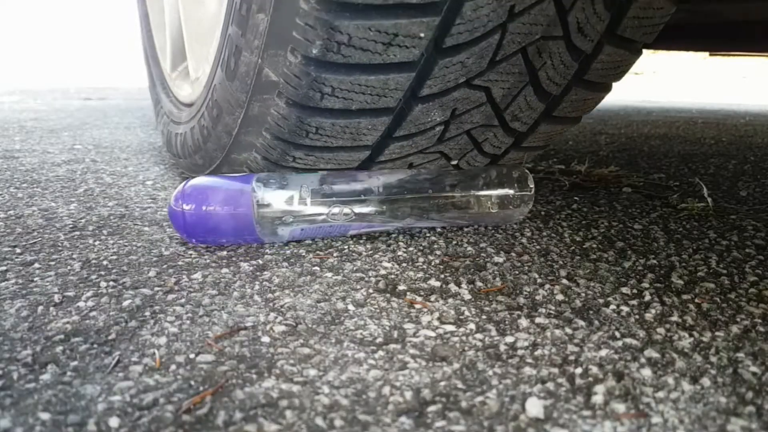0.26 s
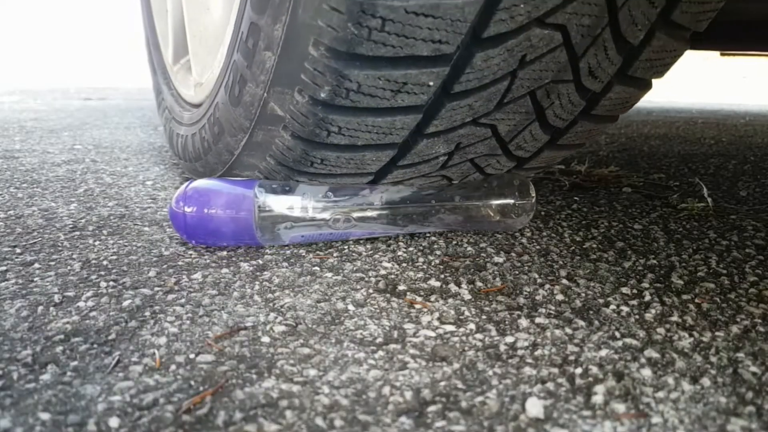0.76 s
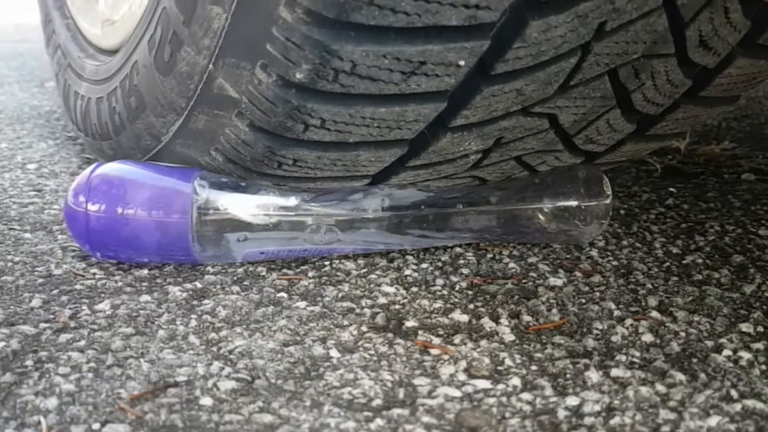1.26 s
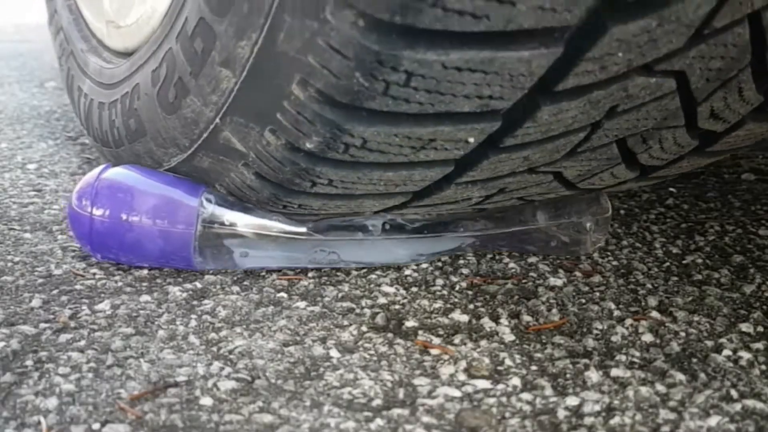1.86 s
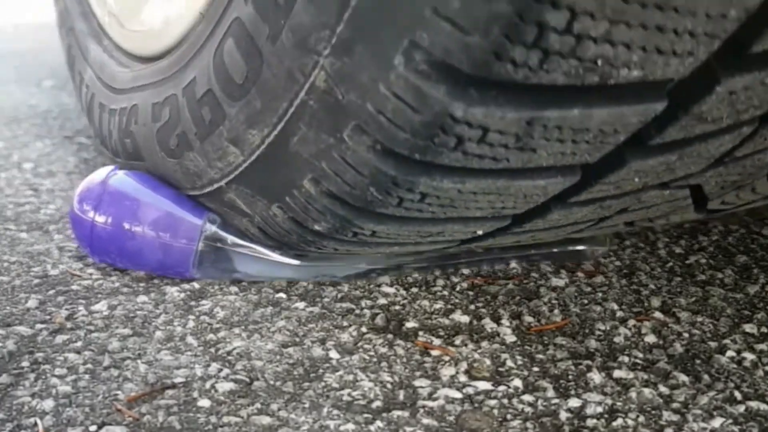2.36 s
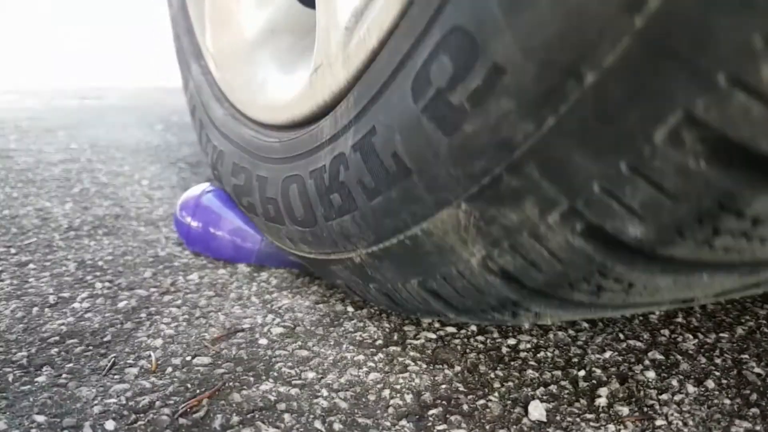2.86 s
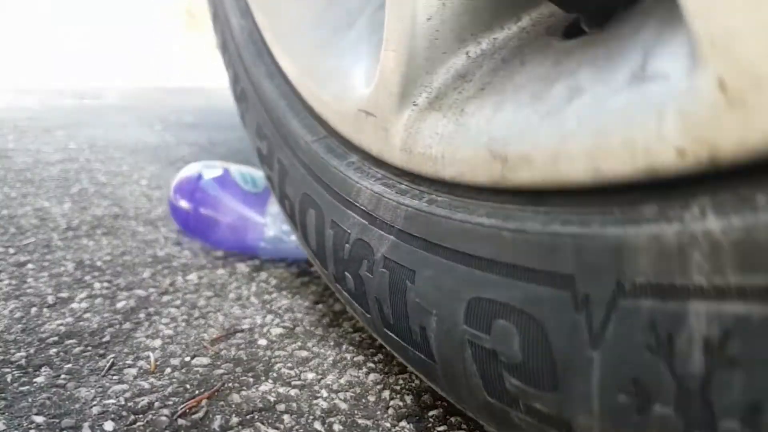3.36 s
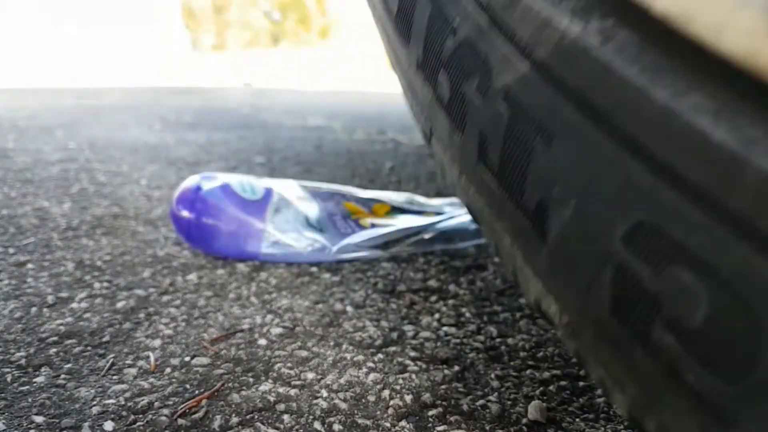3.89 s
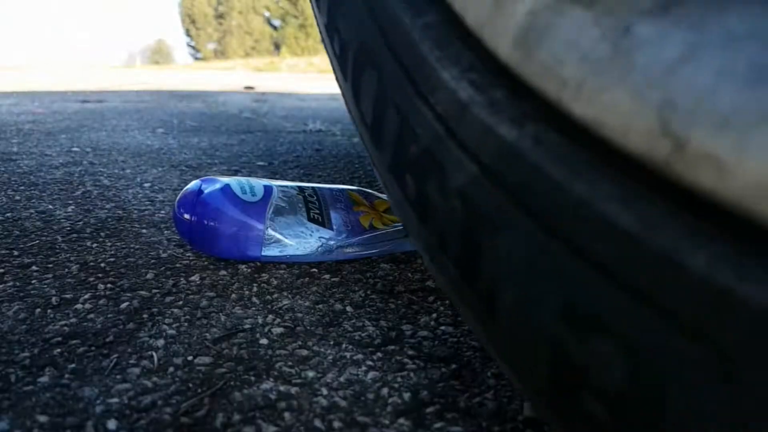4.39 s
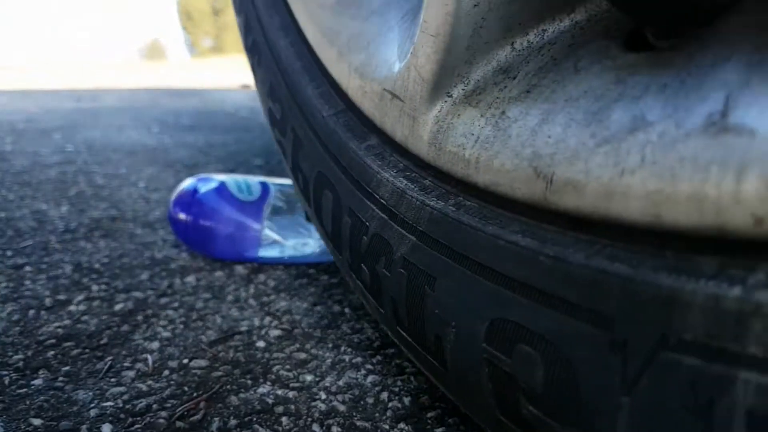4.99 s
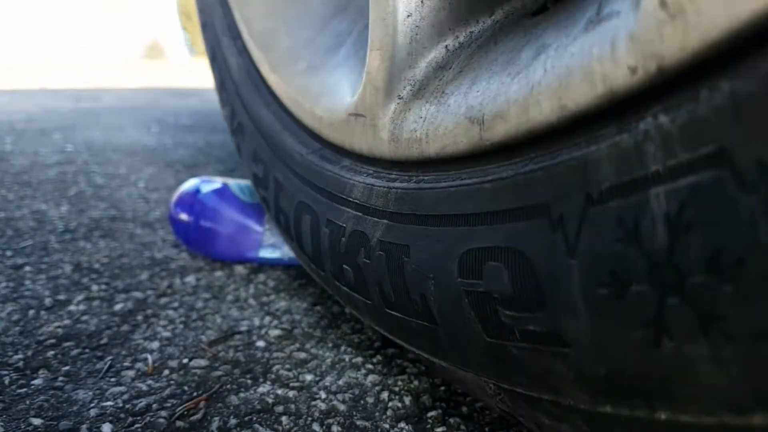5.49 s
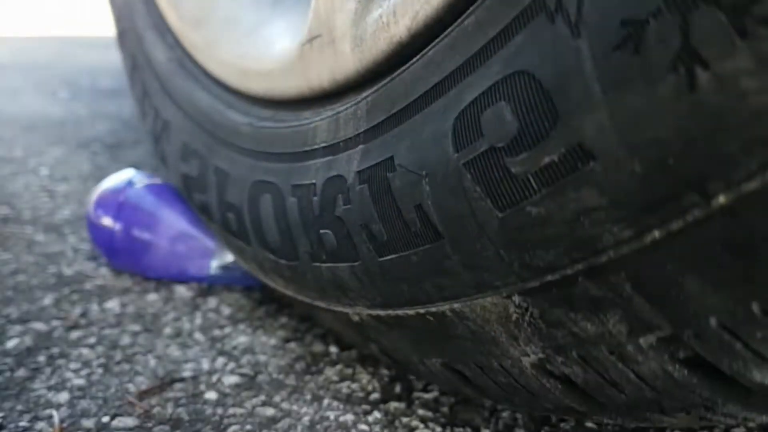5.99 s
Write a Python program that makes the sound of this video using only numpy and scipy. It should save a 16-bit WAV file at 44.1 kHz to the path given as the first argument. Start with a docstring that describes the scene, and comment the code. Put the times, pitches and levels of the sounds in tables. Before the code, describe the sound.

Outdoors on asphalt, near microphone, stereo: hollow plastic snaps from a bottle being squashed, dry and brief with a short reverberant tail. Behind them a steady diesel idle rattles and drones, its volume pumping up around the pops and rising during the squeeze. It thins out, cuts abruptly to the reversing stretch, then builds again through soft pops to a strong final crack.

```python
"""A plastic bottle buckles on asphalt as a car creeps forward over it, then backs over it again.
Each short pop rings modes of the bottle wall, adds a noise crack and echoes under the car.
The idling diesel behind it is exhaust tones, a drone, steady noise and knock timed by the firings.
The background volume is ridden strongly up and down, lifted around the louder pops;
the sound jumps once, at the backward roll."""
import sys
import numpy as np
from scipy import signal
from scipy.fft import rfft, irfft, next_fast_len
from scipy.io import wavfile
from scipy.ndimage import map_coordinates

SR = 44100
rng = np.random.default_rng(int(sys.argv[2]) if len(sys.argv) > 2 else 0)


def waveform_to_disk(signal):
    """Save audio, clipped to [-1, 1], as 16-bit WAV at the path in sys.argv[1]."""
    frames = np.transpose(np.atleast_2d(signal))
    scaled = np.clip(frames, -1, 1) * 32767
    samples = np.round(scaled).astype(np.int16)
    wavfile.write(sys.argv[1], SR, samples)


def natural_amplitude(level_db):
    """Convert a level in decibels to a linear amplitude factor, elementwise."""
    exponent = np.asarray(level_db, float) / 20
    return 10 ** exponent


N = 275165

# slow background gain, including some peaks at pops: time_s, gain_db
BACKGROUND_GAIN = [(0, 9), (.22, 9.5), (.3, 16), (.45, 9.5), (.65, 9.5), (.97, 2), (1.07, -2), (1.22, -4.5),
                   (1.44, 22), (1.65, 21), (1.8, 28.5), (1.9, 23.5), (2.055, 31.5), (2.11, 26), (2.32, 26),
                   (2.62, 12.5), (2.71, 14), (2.81, 12.5), (2.95, 10), (3.09, -8), (3.3, 1), (3.51, -12.5),
                   (3.65, -8.5), (3.87, 0), (3.9, 6.5), (4.02, 3.5), (4.83, 3.5), (4.92, 5.5), (5.28, 4.5),
                   (5.35, 10), (5.43, 5.5), (5.545, 12.5), (5.555, 17.5), (5.97, 16), (6.18, 18.5),
                   (6.24, 13)]
# exhaust tones, rms before the background gain: multiple of firing rate, forward_db, back_db
EXHAUST = [(1, -72, -65), (2, -69.5, -63), (3, -69, -62), (4, -73, -67), (5, -70, -59), (6, -67.5, -68.5),
           (7, -74, -64), (8, -73, -66.5), (9, -68, -72), (10, -67.5, -63), (11, -69.5, -79.5)]
# drone, rms before the background gain: time_s, level_db
DRONE = [(0, -64), (.2, -47), (.48, -61.5), (.75, -60.5), (.95, -48.5), (1.1, -53), (1.43, -56),
         (1.58, -83), (1.9, -71), (2.15, -57.5), (2.3, -76), (2.43, -56), (2.6, -71), (2.8, -58),
         (2.95, -75.5), (3.9, -86)]
# engine noise spectrum, relative, rolling forward and back: freq_hz, density_db_per_hz
ROAR_FORWARD = [(24, -21), (40, -11.5), (243, -2.5), (363, -7), (433, -4.5), (491, -6), (770, -5.5),
                (1520, -12), (2100, -10.5), (3740, -15), (4800, -21.5), (8340, -20.5), (9450, -35),
                (12800, -19), (16000, -33.5)]
ROAR_BACK = [(24, -36), (40, -14), (144, -2), (329, -5), (770, -7), (965, -10), (1240, -9), (1340, -9),
             (3560, -16), (3930, -18), (4800, -21.5), (7930, -21), (9450, -34.5), (12500, -20.5),
             (16000, -33)]
# engine block resonances: centre_hz, width_hz, relative_db
BLOCK = [(438, 21, 5.5), (643.3, 17.7, 9.5), (767, 32, 9), (1077, 39, -3), (1248, 39, 7), (1573, 93, -2),
         (1853, 24, 7.5), (2015, 74, 3), (2185, 29, 2), (2653, 46, 5), (3158, 55, 2.5), (3720, 94, 3.5),
         (4030, 51, 2.5), (4425, 165, 0.5)]
# cylinder striking each block resonance hardest (0-3, -1 none): forward_cylinder, back_cylinder
HARDEST = [(-1, -1), (-1, -1), (-1, -1), (3, 2), (3, 2), (3, 2), (3, 2), (0, 1), (0, 2), (3, 3), (0, 2),
           (3, 2), (3, 2), (3, 2)]
# edges of the bands that knock apart from each other: edge_hz
BLOCK_EDGES_HZ = [0, 900, 1500, 2300, 3200, 4600, 9500, 22050]
# weight of knock against steady noise: freq_hz, power_share (0-1)
KNOCK_SHARE = [(200, 0.07), (700, 0.18), (1500, 0.45), (4000, 0.42), (8000, 0.57), (15000, 0.64)]
# left-right correlation of the engine noise: freq_hz, correlation (0-1)
ALIKE = [(40, .88), (150, .92), (380, .74), (640, .4), (950, .14), (2400, .07), (15000, 0)]
# engine noise balance: freq_hz, left_over_right_db
LEAN = [(60, 7.5), (150, -2), (380, -1), (950, -1.5), (2380, -4), (5980, -3.0), (15000, -2.5)]
# snaps of the bottle wall, often in quick pairs: peak_s, level_db, centre_hz, spread_octaves, crack_db
POPS = [(.3409, -15, 750, 1.1, -26), (.3435, -21, 1500, .5, -26), (.715, -3, 2500, .9, -4),
        (.7161, -5, 2800, .9, -8), (.7207, -10, 1900, .8, -10), (1.4489, -7, 740, .58, -26),
        (1.8059, -8, 2900, .4, -14), (2.0465, -13, 3600, .6, 3), (2.059, -10, 2200, .6, 2),
        (2.4477, -5, 1300, 1, -26), (2.9081, -1.5, 2120, .42, -18), (2.9185, -14, 1950, .3, -20),
        (3.2088, -14, 1800, 1.3, -18), (3.21, -15.5, 900, 1.6, -24), (3.3066, -15, 2600, 1.3, -18),
        (3.3079, -11.5, 560, .9, -24), (5.18, -28, 540, .6, -30), (5.3768, -20, 1900, 1, -18),
        (5.3786, -19, 1000, .7, -20), (5.488, -14.5, 850, .95, -26), (6.1225, -2.5, 1500, 1.2, -22)]
# bottle wall modes: mode_hz, relative_db
WALL = [(270, 8), (430, 7), (570, 7), (760, 0.5), (900, 5), (1150, -2), (1350, 3.5), (1600, 2),
        (1850, -11.5), (2080, 5), (2400, -3.5), (2650, -5.5), (2950, 0.5), (3300, -9.5), (3650, -14.5),
        (4400, -9.5)]
# echo between car floor and road: freq_hz, t60_s
UNDER_CAR = [(300, 0.05), (2000, 0.1), (10000, 0.053)]
# crack spectrum, relative: freq_hz, density_db_per_hz
CRACK = [(1500, -16.5), (3500, 0.5), (4800, -2.5), (7200, 1.5), (8400, -1.5), (9500, -9.5), (12500, -5.5),
         (16000, -27)]

# start of: tyre climbing the bottle, relief after it, backward roll
CLIMB_S, FREED_S, BACK_S = 1.04, 2.6, 3.885
# firings per second: idling, sagging in the climb, relieved, rolling back
IDLE_HZ, CLIMB_HZ, FREED_HZ, BACK_HZ = 28.1, 27.68, 28.33, 28.2
FIRST_BEAT_CYCLES, JUMP_BEAT_CYCLES = -.46, .42  # firing phase at the start; skip at the jump
# background lift around louder pops: gain for a 0 dB pop, dB more per dB of pop, hold each side, slopes
LIFT_DB, LIFT_DB_PER_DB, LIFT_HOLD_S = 27, 1.55, 0.01
RISE_DB_PER_S, FALL_DB_PER_S = 332.5, 331.5
# drone beside the third exhaust tone: final pitch, initial flatness, time constant
DRONE_HZ, DRONE_FLAT_HZ, DRONE_SETTLE_S = 90.8, 2.8, 0.603
FORWARD_CYLINDER, BACK_CYLINDER = 3, 2  # hardest over all bands
HARDER_RING_DB, HARDER_BROAD_DB = 6, 2.5
RING_T60_S, RING_LAW = .028, .5  # wall decay at 1 kHz excited width; power of its fall with width
BOTTLE_LEAN_DB = -2.5  # left over right
TOP_HZ = 15950


def unit(x):
    """Scale to rms 1."""
    return x / np.sqrt(np.mean(x ** 2) + 1e-20)


def along(points, hz):
    """Read (freq_hz, value) points on a log frequency axis."""
    point_hz, value = np.transpose(points)
    return np.interp(np.log(hz + 1), np.log(point_hz + 1), value)


def curves(rows):
    """One value per sample for each column after the time."""
    time_s, *columns = np.transpose(rows)
    return [np.interp(np.arange(N) / SR, time_s, column) for column in columns]


def wobble(rate_hz):
    """Smooth random curve set by rate_hz knots per second."""
    knots = rng.standard_normal(int(N * rate_hz / SR) + 4)
    return map_coordinates(knots, [np.arange(N) * rate_hz / SR])


def filtered(x, response):
    """Multiply the spectrum by a response of frequency."""
    size = next_fast_len(N + 8192)
    spectrum = rfft(x, size) * response(np.fft.rfftfreq(size, 1 / SR))
    return irfft(spectrum, size)[..., :N]


def pair(x):
    """Mix two unrelated signals into left and right, alike in the bass and unrelated in the treble."""
    def mixing(hz):
        angle = np.arccos(np.clip(along(ALIKE, hz), -1, 1)) / 2
        return np.array([np.cos(angle), np.sin(angle)])

    mid, side = filtered(x, mixing)
    left_right = np.array([mid + side, mid - side])
    return filtered(left_right, lambda hz: natural_amplitude(np.outer([.5, -.5], along(LEAN, hz))))


def firing_count():
    """Cylinder firings so far: the integrated firing rate, with a skip at the backward roll."""
    t = np.arange(N) / SR
    rate_hz = np.select([t < CLIMB_S, t < FREED_S, t < BACK_S], [IDLE_HZ, CLIMB_HZ, FREED_HZ], BACK_HZ)
    return FIRST_BEAT_CYCLES + np.cumsum(rate_hz) / SR + JUMP_BEAT_CYCLES * (t > BACK_S)


def background_gain():
    """Ridden background volume: the slow gain, or the lift around a pop where that is higher."""
    t, gain_db = np.arange(N) / SR, curves(BACKGROUND_GAIN)[0]
    for peak_s, pop_db, *_ in POPS:
        away_s = np.maximum(np.abs(t - peak_s) - LIFT_HOLD_S, 0)
        slope_db_per_s = np.where(t < peak_s, RISE_DB_PER_S, FALL_DB_PER_S)
        lift_db = LIFT_DB + LIFT_DB_PER_DB * pop_db - away_s * slope_db_per_s
        gain_db = np.maximum(gain_db, lift_db)
    return natural_amplitude(gain_db)


def tones(firings, back):
    """Wavering exhaust harmonics locked to the firings, plus a drone settling upward in pitch."""
    exhaust = 0
    for multiple, forward_db, back_db in EXHAUST:
        level_db = np.where(back, back_db, forward_db) + 2.2 * wobble(6)
        phase = 2 * np.pi * (multiple * firings + rng.random()) + .6 * wobble(7)
        exhaust = exhaust + natural_amplitude(level_db) * np.sin(phase)
    drone_db, = curves(DRONE)
    drone_hz = DRONE_HZ - DRONE_FLAT_HZ * np.exp(-np.arange(N) / SR / DRONE_SETTLE_S)
    drone_phase = 2 * np.pi * np.cumsum(drone_hz) / SR + .5 * wobble(6)
    drone = natural_amplitude(drone_db + 2.5 * wobble(11)) * np.sin(drone_phase)
    hum = np.sqrt(2) * (exhaust + drone)  # peak to rms levels
    # right: 14 samples later, 0.6 dB stronger
    return np.array([hum, natural_amplitude(.6) * np.roll(hum, 14)])


def bursts(firings, shared_db, cylinder, harder_db, spread_db, decay_cycles):
    """Stereo noise swelling at each firing, with random strength and delay; one cylinder of four is harder."""
    size_db, late = rng.standard_normal((2, 200))
    beat = firings + 0.32
    count = beat.astype(int) + 1
    since_cycles = np.clip(beat % 1 - 0.046 * np.abs(late[count]), 0, 1)
    harder = (count - 1) % 4 == cylinder
    size = natural_amplitude(shared_db[count] + spread_db * size_db[count] + harder_db * harder)
    envelope = size * (1 - np.exp(-since_cycles / 0.095)) * np.exp(-since_cycles / decay_cycles)
    return unit(envelope) * rng.standard_normal((2, N))


def knock(firings, back):
    """Diesel knock: each firing bursts broadly, band by band, and strikes the block resonances."""
    shared_db = 1.1 * rng.standard_normal(200)  # strength of each firing
    loud_cylinder = np.where(back, BACK_CYLINDER, FORWARD_CYLINDER)
    broad = 0
    for low_hz, high_hz in zip(BLOCK_EDGES_HZ, BLOCK_EDGES_HZ[1:]):
        burst = bursts(firings, shared_db, loud_cylinder, HARDER_BROAD_DB, spread_db=2.0, decay_cycles=.52)
        broad = broad + filtered(burst, lambda hz: (hz >= low_hz) & (hz < high_hz))
    rings = 0
    for (centre_hz, width_hz, db), (forward_cylinder, back_cylinder) in zip(BLOCK, HARDEST):
        cylinder = np.where(back, back_cylinder, forward_cylinder)
        burst = bursts(firings, shared_db, cylinder, HARDER_RING_DB, spread_db=2.2, decay_cycles=.16)

        def resonance(hz):
            damping = 1j * hz * width_hz
            return natural_amplitude(db) * damping / (centre_hz ** 2 - hz ** 2 + damping)

        rings = rings + filtered(burst, resonance)
    return broad + natural_amplitude(4) * rings


def roar(firings, back):
    """Steady noise plus knock, coloured for each rolling direction; the right channel lags."""
    def share(hz):
        return np.clip(along(KNOCK_SHARE, hz), 0, 1)

    steady = filtered(rng.standard_normal((2, N)), lambda hz: np.sqrt(1 - share(hz)))
    knocking = filtered(knock(firings, back), lambda hz: np.sqrt(share(hz)))
    noise = pair(steady + knocking)
    noise[1] = np.roll(noise[1], 14)
    forward = unit(filtered(noise, lambda hz: natural_amplitude(along(ROAR_FORWARD, hz))))
    backward = unit(filtered(noise, lambda hz: natural_amplitude(along(ROAR_BACK, hz))))
    return np.where(back, natural_amplitude(-47) * backward, natural_amplitude(-50) * forward)


def engine():
    """Tones and roar share the firing clock and the background gain."""
    firings = firing_count()
    back = np.arange(N) / SR > BACK_S
    return background_gain() * (tones(firings, back) + roar(firings, back))


def under_car():
    """Fresh stereo echo tail, left energy 1: noise decaying at a speed set by frequency."""
    hz, t, z = signal.stft(rng.standard_normal((2, 4410)), SR, nperseg=128)
    decay = natural_amplitude(-60 * t / along(UNDER_CAR, hz)[:, None])
    tail = signal.istft(z * decay, SR, nperseg=128)[1]
    return tail / np.linalg.norm(tail[0])


def crack_colour():
    """Short filter kernel with the spectrum of the crack."""
    return np.roll(irfft(natural_amplitude(along(CRACK, np.fft.rfftfreq(512, 1 / SR)))), 256)


def wall_ring(t, centre_hz, spread_octaves):
    """Wall modes near the centre ring nearly in step; the wider the band, the sooner it dies."""
    mode_hz, mode_db = np.transpose(WALL)[:, :, None]
    t60_s = RING_T60_S * (1000 / (centre_hz * spread_octaves)) ** RING_LAW
    struck = natural_amplitude(mode_db) * np.exp(-(np.log2(mode_hz / centre_hz) / spread_octaves) ** 2)
    struck = struck / np.sum(struck) ** .85 * natural_amplitude(rng.normal(0, 1.5, (2, len(mode_hz), 1)))
    slip_rad = rng.normal(0, .5, mode_hz.shape)
    rise = np.exp(-(np.minimum(t, 0) * centre_hz / .6) ** 2)  # within about one cycle
    modes = np.sum(struck * np.cos(2 * np.pi * mode_hz * t + slip_rad), axis=1)
    return modes * rise * natural_amplitude(-60 * np.maximum(t, 0) / t60_s)


def crack(t):
    """Coloured noise peaking at the snap, with a faster rise than fall."""
    noise = rng.standard_normal((2, 4410))
    hiss = signal.fftconvolve(noise, crack_colour()[None], "valid", axes=1)[:, :len(t)]
    return natural_amplitude(-60 * np.abs(t) / np.where(t < 0, .008, .02)) * unit(hiss) / 2


def bottle():
    """Each buckle of the wall rings and cracks; an echo follows 150 samples later."""
    out = np.zeros((2, N + SR))
    lead = 88  # samples before the peak
    t = np.arange(-lead, 2205) / SR
    for peak_s, level_db, centre_hz, spread_octaves, crack_db in POPS:
        channel_db = level_db + np.array([[.5], [-.5]]) * BOTTLE_LEAN_DB
        pop = natural_amplitude(channel_db) * (wall_ring(t, centre_hz, spread_octaves) + natural_amplitude(crack_db) * crack(t))
        echo = natural_amplitude(-9.5) * signal.fftconvolve(pop, under_car(), axes=1)
        start = round(peak_s * SR) - lead
        out[:, start:][:, :len(t)] += pop
        out[:, start + 150:][:, :echo.shape[1]] += echo
    # the small bottle radiates little bass
    return filtered(out[:, :N], lambda hz: hz ** 2 / (hz ** 2 + 200 ** 2))


def scene():
    """Engine and bottle."""
    return engine() + bottle()


def roll_off(x):
    """The treble ends steeply here."""
    return signal.sosfilt(signal.butter(12, 16820, fs=SR, output="sos"), x)


def record(dry):
    """Band-limit and finish the mix."""
    mix = filtered(dry, lambda hz: hz < TOP_HZ)
    return roll_off(mix)


dry = scene()
out = record(dry)
waveform_to_disk(out)
```